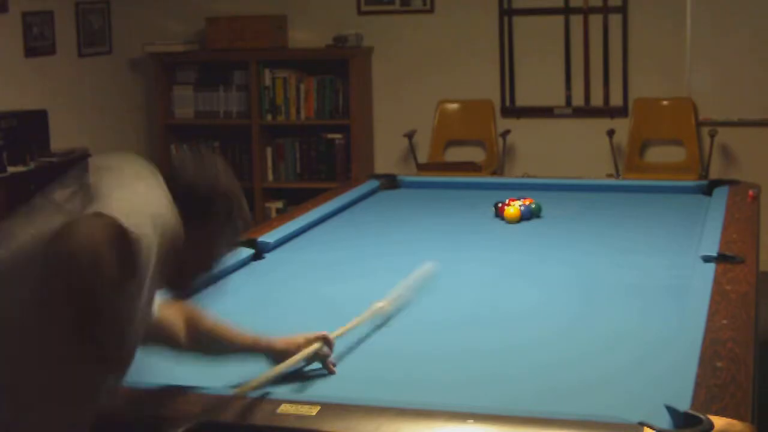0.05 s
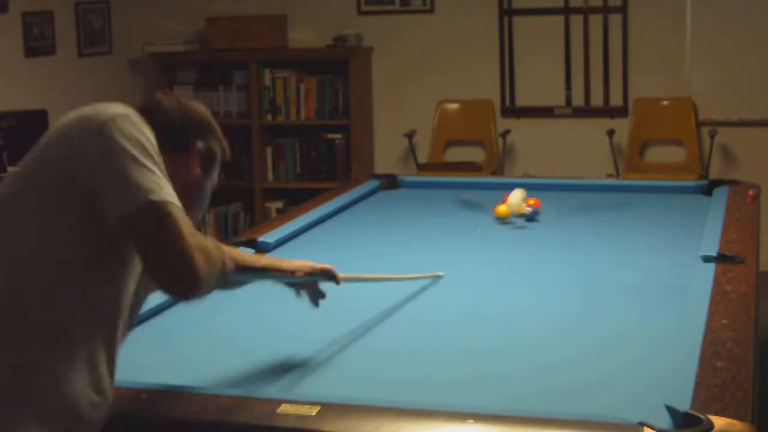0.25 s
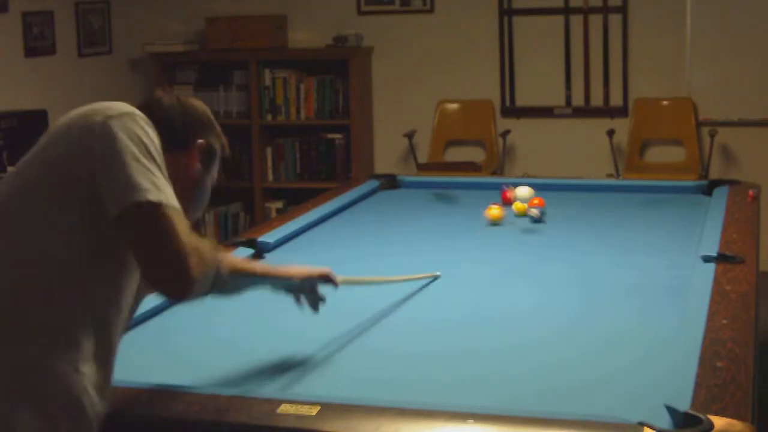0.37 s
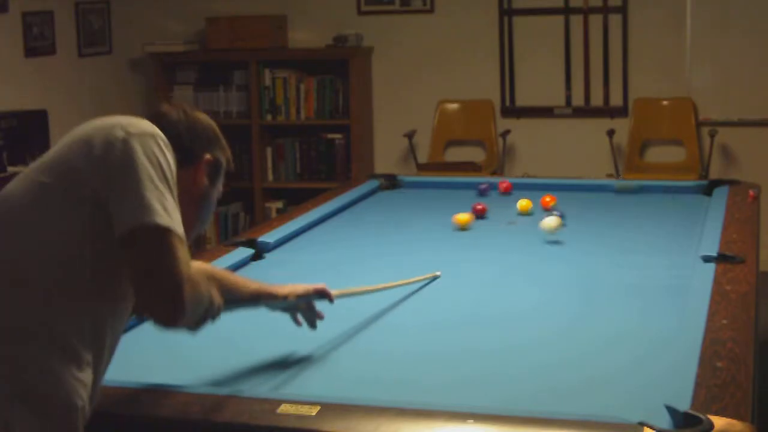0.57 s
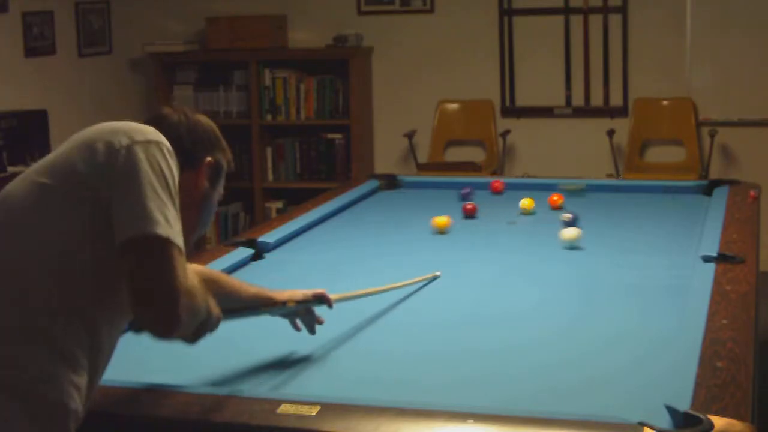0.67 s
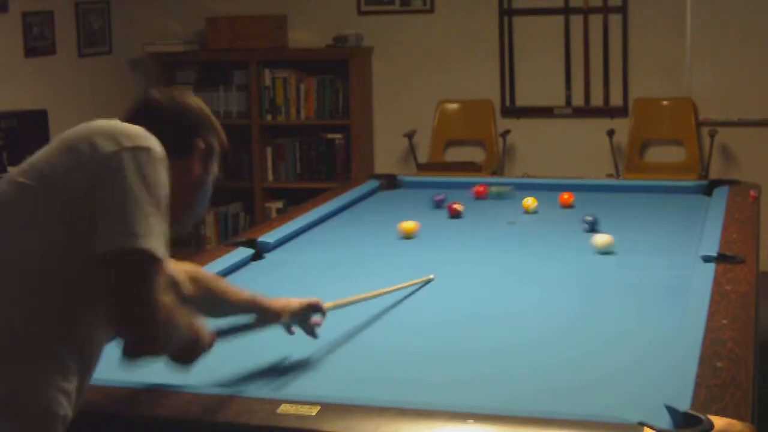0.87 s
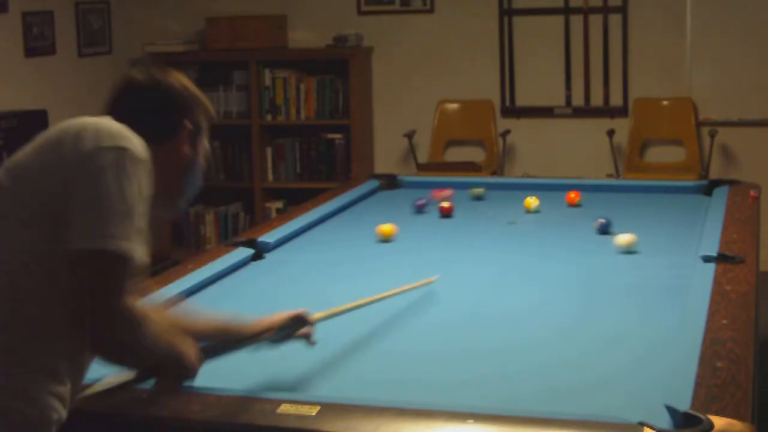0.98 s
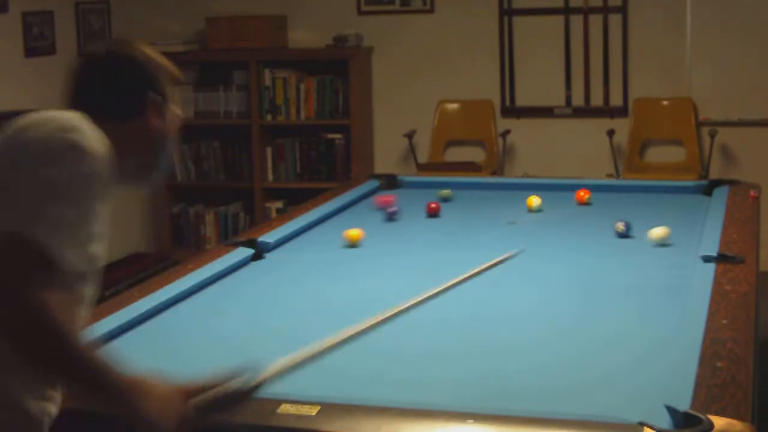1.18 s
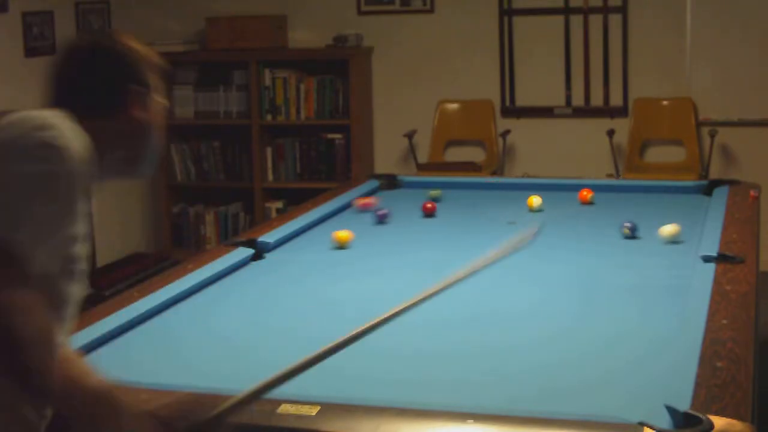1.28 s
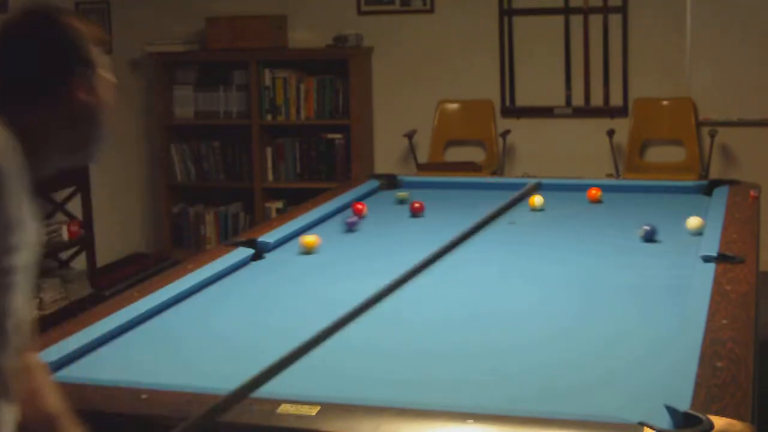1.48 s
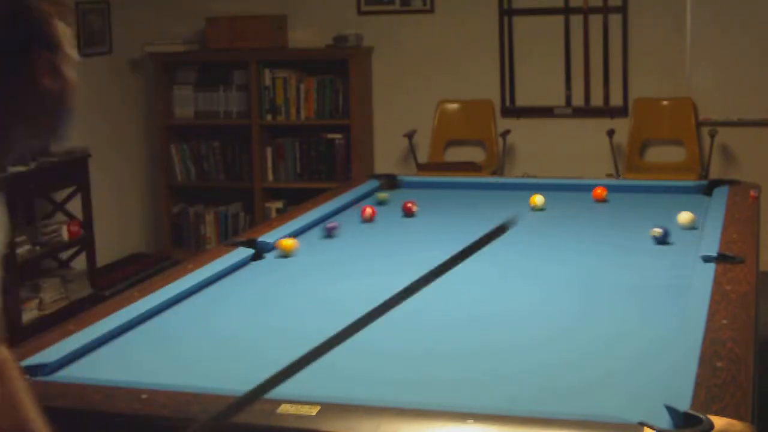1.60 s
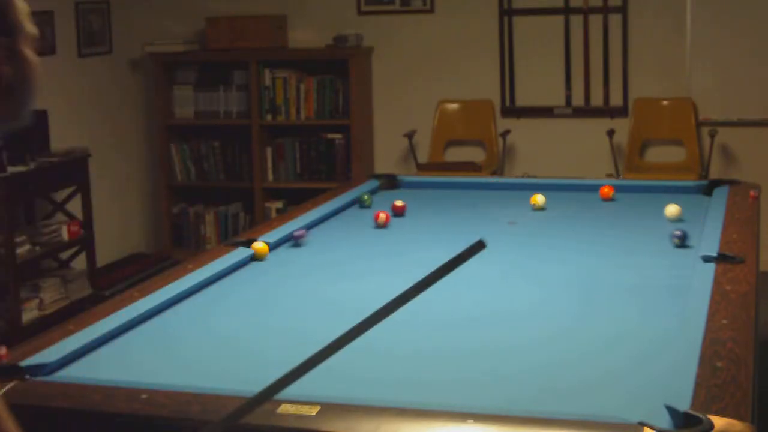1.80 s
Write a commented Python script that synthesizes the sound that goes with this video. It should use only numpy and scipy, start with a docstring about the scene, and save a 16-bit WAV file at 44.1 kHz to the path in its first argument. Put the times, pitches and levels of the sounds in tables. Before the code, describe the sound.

Pool balls scatter with loud clacks after a sharp cue strike, then thump the rails.

```python
"""A small, live room with a pool table, on the break: the cue slides through the hand and cracks
against the cue ball, the rack bursts apart, balls thump the rails and slap a pocket, then rumble on
over the slate and kiss a few more times. Each blow is a burst of coloured noise with a room tail;
cue and balls add short ringing tones. Hiss, hum and a thin whine sit underneath,
and the loudest hits overload the microphone input into hard clipping."""
import sys
import numpy as np
from scipy import signal
from scipy.fft import rfft, irfft, next_fast_len
from scipy.io import wavfile

SR = 44100
rng = np.random.default_rng(int(sys.argv[2]) if len(sys.argv) > 2 else 0)


def store_pcm(level_fs):
    """Save levels as 16-bit WAV."""
    pcm = np.round(np.clip(level_fs, -1, 1) * 32767).astype(np.int16)
    wavfile.write(sys.argv[1], SR, np.atleast_2d(pcm).T)


N = 81585
T = np.arange(N) / SR
FFT_SIZE = next_fast_len(2 * N)
HZ = np.fft.rfftfreq(FFT_SIZE, 1 / SR)

# stereo width of hits and rolling, near mono in the bass (frequency [Hz], side over mid [dB])
TABLE_WIDTH = [(60, -26), (400, -24.5), (1200, -25.5), (2800, -16), (6000, -10.5), (12000, -3)]
# wider image of the hiss and cue swishes (frequency [Hz], side over mid [dB])
AIR_WIDTH = [(60, -10), (250, -11), (700, -10), (1500, -9), (3000, -4), (6000, -3.5), (12000, -0.5)]


def amp(db):
    """Decibels to gain."""
    return 10 ** (np.asarray(db) / 20)


def unit(x):
    """Scale to rms 1."""
    return x / np.sqrt(np.mean(np.abs(x) ** 2) + 1e-20)


def along(points, hz):
    """Read (frequency [Hz], value) points on a log axis."""
    freqs, values = np.transpose(points)
    return np.interp(np.log(hz + 1), np.log(freqs), values)


def fader(points):
    """A gain ride through (time [s], level [dB]) points, silent before the first."""
    times, db = np.transpose(points)
    return amp(np.interp(T, times, db, left=-120))


def swell(peak_s, spread_s):
    """A bell-shaped rise and fall."""
    return np.exp(-((T - peak_s) / spread_s) ** 2 / 2)


def filtered(x, response):
    """Pass x through a frequency response."""
    return irfft(rfft(x, FFT_SIZE) * response, FFT_SIZE)[..., :N]


def minimum_phase(gain):
    """A unit-power response of this shape with no pre-ring, so attacks stay sharp."""
    cepstrum = irfft(np.log(np.maximum(gain, 1e-6)), FFT_SIZE)
    cepstrum[1:FFT_SIZE // 2] *= 2
    cepstrum[FFT_SIZE // 2 + 1:] = 0
    return unit(np.exp(rfft(cepstrum)))


def resonance(hz, width_hz):
    """Gain of a steep peak: two band-passes of this width in series."""
    return (HZ * width_hz / np.hypot(hz ** 2 - HZ ** 2, HZ * width_hz)) ** 2


def modal(modes):
    """Gain of a bank of resonances."""
    return sum(amp(db) * resonance(hz, width) for hz, width, db in modes)


def stereo_noise(width):
    """Mid/side noise, spread band by band as the width says."""
    mid, side = rng.standard_normal((2, N))
    side = filtered(side, amp(along(width, HZ)))
    return np.array([mid + side, mid - side])


def rush(spectrum, width):
    """Coloured stereo noise of rms 1."""
    return unit(filtered(stereo_noise(width), amp(along(spectrum, HZ))))


def tone(hz):
    """A steady sine of rms 1."""
    return unit(np.sin(2 * np.pi * hz * T))


def ring(start_s, db, hz, t60):
    """One mode, struck and dying away."""
    age = np.maximum(T - start_s, 0)
    return amp(db - 60 * age / t60) * np.sin(2 * np.pi * hz * age)


def blow(start_s, db, colour, direct_db):
    """One impact: the direct crack, early echoes, then a room tail whose treble dies first."""
    # room decay (frequency [Hz], t60 [s])
    room_decay = [(60, .7), (250, 0.61), (800, 0.55), (2100, 0.45), (5500, 0.4), (10000, 0.34),
                  (15000, 0.28)]
    # reflections off nearby walls (delay [s], level over the tail [dB])
    echoes = [(.008, -8), (0.016, -12), (0.053, -17)]
    build_s, direct_s, echo_s = 0.0067, 0.004, 0.002
    hz, age, bands = signal.stft(stereo_noise(TABLE_WIDTH), SR, nperseg=256)
    decay = amp(-60 * age / along(room_decay, hz)[:, None])
    tail = signal.istft(bands * decay, SR, nperseg=256)[1][:, :N]
    envelope = 1 - np.exp(-T / build_s)
    envelope += amp(direct_db) * np.exp(-(T / direct_s) ** 2)
    envelope += sum(amp(echo_db) * swell(delay, echo_s) for delay, echo_db in echoes)
    hit = filtered(tail * envelope, minimum_phase(colour))
    return amp(db) * np.pad(hit, ((0, 0), (round(start_s * SR), 0)))[:, :N]


def room_tone():
    """A steady bed of room hiss, mains hum and thin electrical whine."""
    # bass-heavy hiss (frequency [Hz], level [dB])
    hiss_eq = [(25, -22), (50, -6), (80, -5), (170, -11.5), (300, -13), (450, -9), (690, -14), (860, -12.5),
               (1860, -20.5), (4500, -23.5), (7700, -24.5), (15000, -27)]
    hiss = amp(-46.5) * rush(hiss_eq, AIR_WIDTH)
    hum = amp(-55) * tone(125)
    whine = amp(-62.5) * tone(7870)
    return hiss + hum + whine


def cue_slide():
    """The shaft swishes over the player's hand and rustles as it is drawn back."""
    # slides over the hand (peak time [s], spread [s], level [dB])
    slides = [(0.208, 0.063, -42.5), (1.766, 0.01, -45.5)]
    # broad swish of the shaft (frequency [Hz], level [dB])
    swish_eq = [(100, -6), (500, 1), (2000, 0), (4500, -6), (10000, 1), (15000, -2)]
    # thin rustle of the draw (frequency [Hz], level [dB])
    rustle_eq = [(2000, -16), (4400, -5), (5300, 4), (6500, -4), (10500, -10), (14000, -26)]
    swish = sum(amp(db) * swell(s, spread) for s, spread, db in slides)
    rustle = amp(-38) * swell(peak_s=1.025, spread_s=0.043)
    return swish * rush(swish_eq, AIR_WIDTH) + rustle * rush(rustle_eq, AIR_WIDTH)


def cue_strike():
    """The tip cracks against the cue ball and rings the shaft."""
    # the cue's own dry ring (frequency [Hz], level [dB], t60 [s])
    tock_modes = [(1526, 27.5, 0.01), (3476, 8.5, 0.064)]
    # resonances of cue and tip (frequency [Hz], width [Hz], level [dB])
    cue_modes = [(417, 89, -4), (687, 39, -5), (920, 80, -1), (1090, 107, 0.5), (1635, 102, 5.5),
                 (2306, 110, -0.5), (2670, 62, -8), (3474, 100, -5.5), (3760, 290, -4.5), (4360, 490, -7.5)]
    # broad crack of the tip (frequency [Hz], level [dB])
    tip_eq = [(60, -32), (250, -20), (400, -9.5), (1500, -8.5), (4000, -11.5), (7000, -15.5), (11000, -18),
              (15000, -24)]
    stroke_s = 0.2028
    tock = sum(ring(stroke_s, db, hz, t60) for hz, db, t60 in tock_modes)
    colour = np.hypot(modal(cue_modes), amp(along(tip_eq, HZ)))
    return tock + blow(stroke_s, db=7, colour=colour, direct_db=0)


def treble_snaps():
    """Bright snaps of treble on the cue strike and around one later clack."""
    # short noise bursts (time [s], level [dB], t60 [s])
    snaps = [(0.21, 5, .11), (1.043, -9.5, 0.0031), (1.059, -26, .01)]
    # thin, bright snap (frequency [Hz], level [dB])
    snap_eq = [(1500, -44), (4000, -3), (7000, -7), (11000, -4.5), (15000, -7.5)]
    bursts = sum((T >= s) * amp(db - 60 * np.maximum(T - s, 0) / t60) for s, db, t60 in snaps)
    return bursts * rush(snap_eq, TABLE_WIDTH)


def ball_clacks():
    """Balls collide, clustered as the rack bursts, then in light kisses, each at its own pitch."""
    # ball on ball (time [s], level [dB], pitch [ratio], attack emphasis [dB])
    collisions = [(.251, -5.5, 1.26, 5), (.371, 10, 1.047, 20), (.383, 5.5, 1.333, -1),
                  (.405, 9.5, 1.09, 6), (.455, -2, 0.813, 10.5), (0.486, -4, 0.845, 2),
                  (.532, -10.5, 1.19, 1), (.585, -21, 1.23, 2), (.645, -6.5, 1.1, -1),
                  (1.0406, -11.5, 0.99, 0.5), (1.0426, -17, 1, 6.5), (1.3054, -37.5, 1.02, 8),
                  (1.448, -41, 1.05, 6), (1.5587, -40.5, 0.97, 8)]
    # hard clack (frequency [Hz], level [dB])
    clack_eq = [(60, -23.5), (220, -22), (300, -24.5), (450, -11.5), (750, -21.5), (1200, -8), (1700, -0.5),
                (2200, 1), (2800, -2), (3500, -11), (4500, -23.5), (7000, -31), (15000, -33)]
    click_db, grit_db = 3.5, -3.5  # trims for the tonal and noisy parts of the attack
    clacks = np.zeros((2, N))
    for s, db, pitch, attack_db in collisions:
        clacks += ring(s, db + attack_db + click_db, hz=2086 * pitch, t60=0.0099)
        clacks += blow(s, db, amp(along(clack_eq, HZ / pitch)), attack_db + grit_db)
    return clacks


def rails_and_pocket():
    """Balls thump the cloth and wooden rails, slap a pocket's hard rim and knock softly as they slow."""
    # ball on cloth, rail or pocket (time [s], level [dB], pitch [ratio])
    thump_hits = [(.308, -10, 0.78), (.47, -8, 0.99), (0.556, -16, 1), (0.6431, 4, 1.09),
                  (.715, -0.5, 1.16), (.785, -3.5, 1.15), (.835, -7, 0.97), (.895, -11.5, 0.99),
                  (.95, -19.5, 0.67)]
    # woody thump (frequency [Hz], level [dB])
    rail_eq = [(40, -29), (100, -25), (170, -17), (230, -12), (310, -11), (390, -1), (650, -1), (1050, 1.5),
               (1400, -4.5), (2000, -9.5), (3000, -21), (4300, -28.5), (5500, -34), (7500, -35),
               (15000, -42)]
    # ball on the pocket rim (time [s], level [dB])
    slap_hits = [(0.689, -5.5), (.696, 1.5)]
    # bright slap (frequency [Hz], level [dB])
    rim_eq = [(100, -16.5), (500, -7), (1300, -4), (1800, 0.5), (2600, -9.5), (4000, -17), (5500, -13),
              (7500, -17), (10150, -13), (10500, -8), (10850, -15.5), (15000, -24)]
    # late, soft knocks (time [s], level [dB])
    knock_hits = [(1.448, -48), (1.57, -42.5)]
    thumps = sum(blow(s, db, amp(along(rail_eq, HZ / pitch)), direct_db=1)
                 for s, db, pitch in thump_hits)
    slaps = sum(blow(s, db, amp(along(rim_eq, HZ)), direct_db=-10) for s, db in slap_hits)
    knocks = sum(blow(s, db, resonance(hz=480, width_hz=270), direct_db=1) for s, db in knock_hits)
    return thumps + slaps + knocks


def rolling():
    """Balls rumble over the cloth-covered slate; the table's body hums and gives one dull boom."""
    # rumble fading as the balls slow (time [s], level [dB])
    rumble_ride = [(.37, -61), (.45, -25.5), (1, -41), (1.28, -40.5), (1.4, -45), (1.601, -45.5),
                   (1.85, -58)]
    # dark rumble of the slate (frequency [Hz], level [dB])
    slate_eq = [(25, -16), (60, -1), (100, 3.5), (170, -1), (300, -17), (430, -7), (650, -9.5), (1200, -1),
                (2500, -19.5), (6000, -43.5)]
    # swell of the body's hum (time [s], level [dB])
    body_ride = [(.37, -44), (.65, -37), (.85, -27), (1, -30), (1.1, -38.5), (1.28, -51), (1.36, -49),
                 (1.85, -59.5)]
    # low modes of the table's body (frequency [Hz], width [Hz], level [dB])
    body_modes = [(99, 22, -9), (232.4, 24, -1.5), (441, 40, -6.5)]
    rumble = fader(rumble_ride) * rush(slate_eq, TABLE_WIDTH)
    body = fader(body_ride) * unit(filtered(stereo_noise(TABLE_WIDTH), modal(body_modes)))
    boom = amp(-41.5) * swell(peak_s=1.273, spread_s=0.029) * tone(100)
    return rumble + body + boom


def scene():
    """Everything that reaches the microphone."""
    return (room_tone() + cue_slide() + cue_strike() + treble_snaps()
            + ball_clacks() + rails_and_pocket() + rolling())


def record(dry):
    """The overloaded input clips with a hard knee, then the very top is cut off."""
    ceiling, hardness, top_hz = amp(-6), 7, 15400
    clipped = dry / (1 + np.abs(dry / ceiling) ** hardness) ** (1 / hardness)
    return filtered(clipped, HZ < top_hz)


dry = scene()
out = record(dry)
store_pcm(out)
```